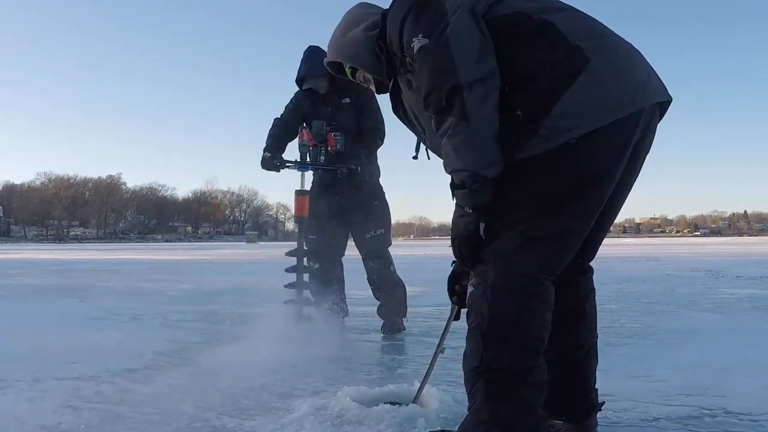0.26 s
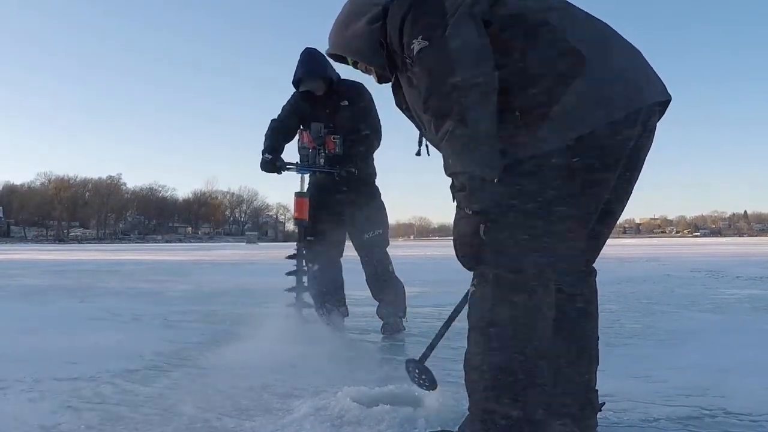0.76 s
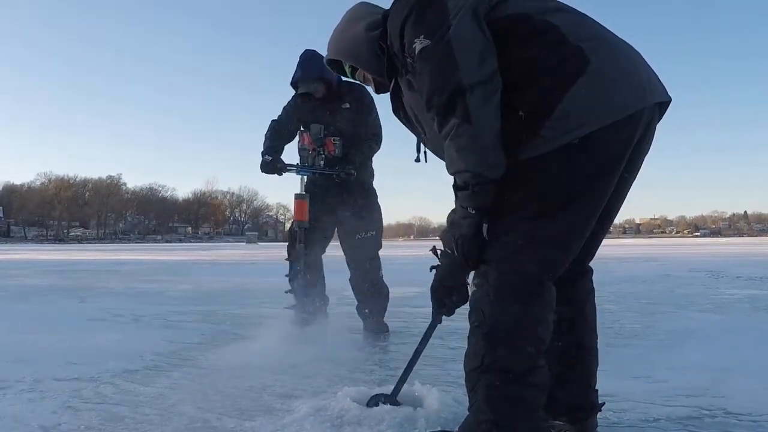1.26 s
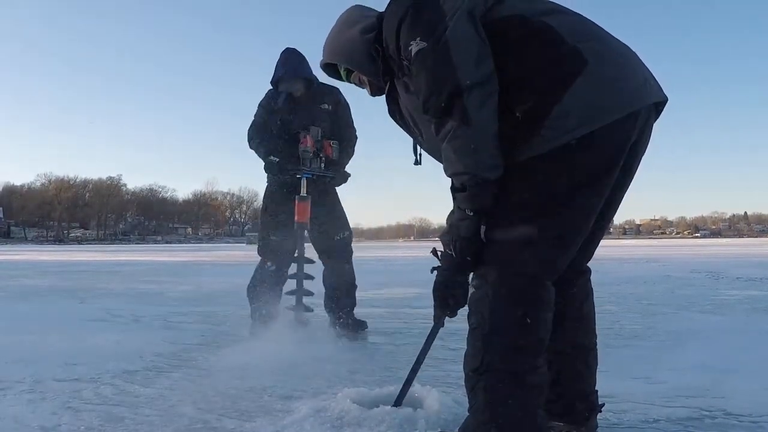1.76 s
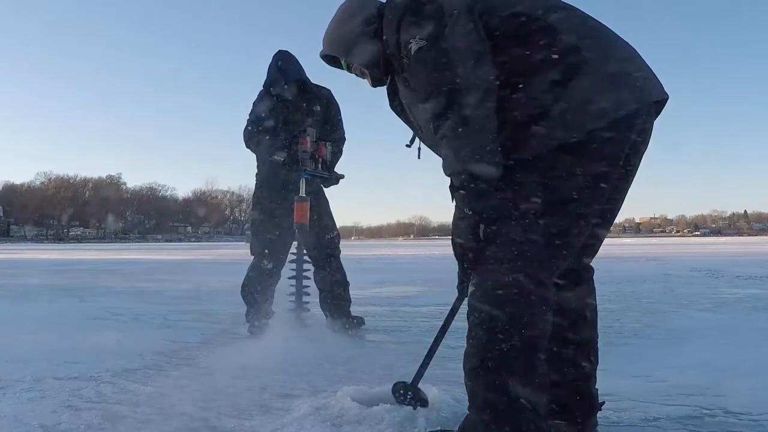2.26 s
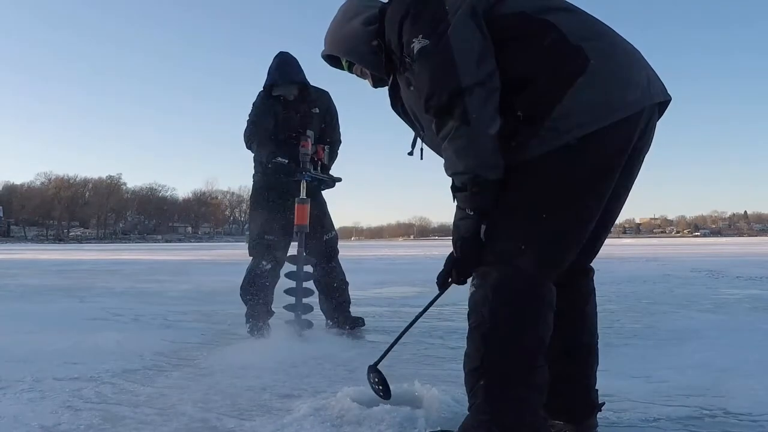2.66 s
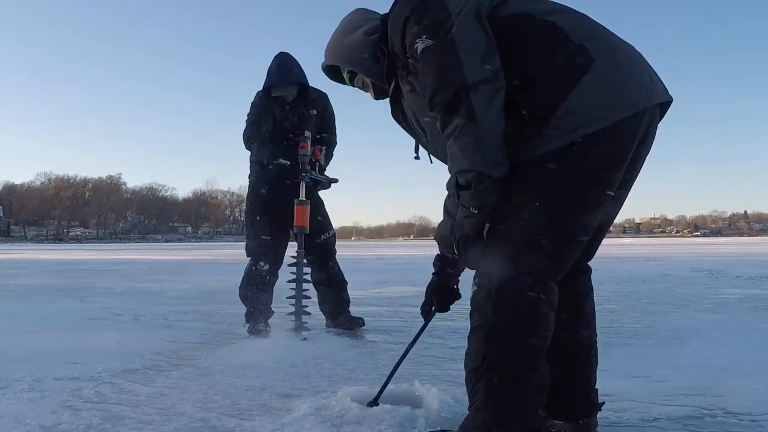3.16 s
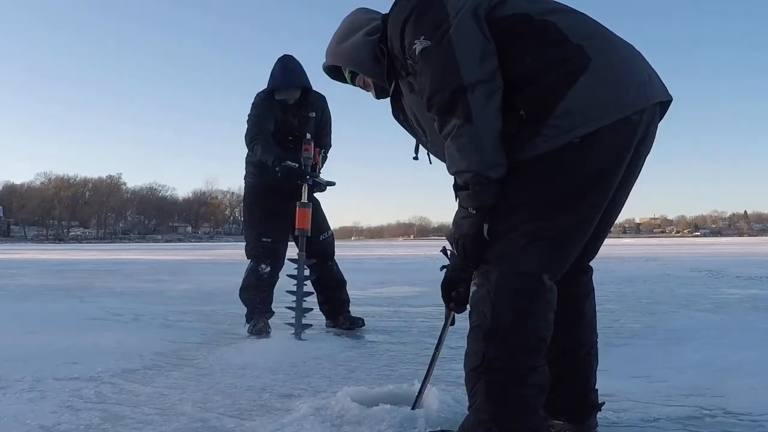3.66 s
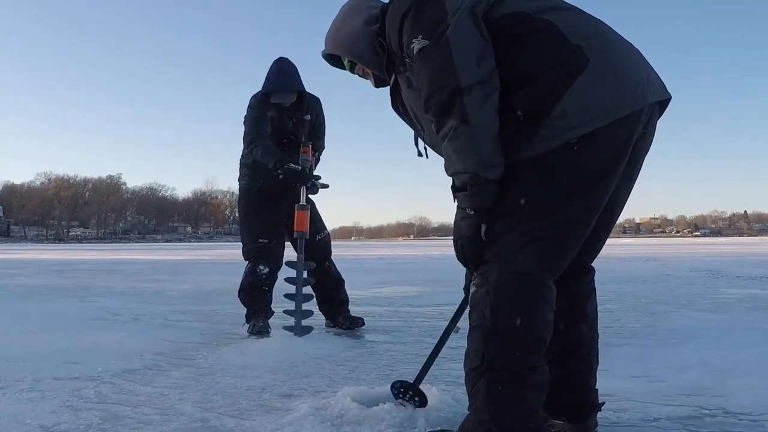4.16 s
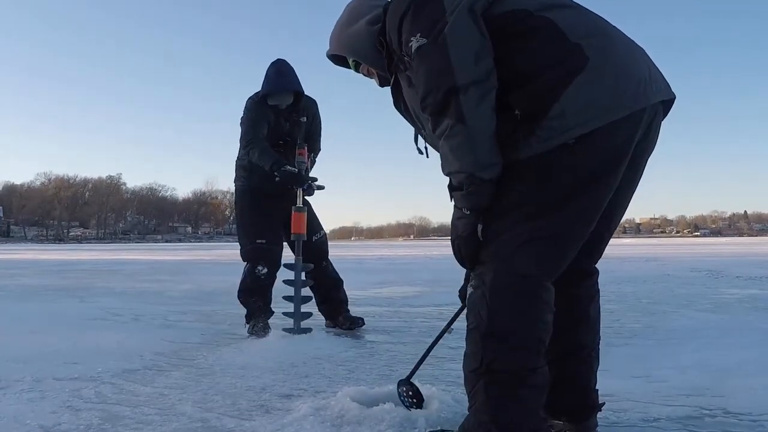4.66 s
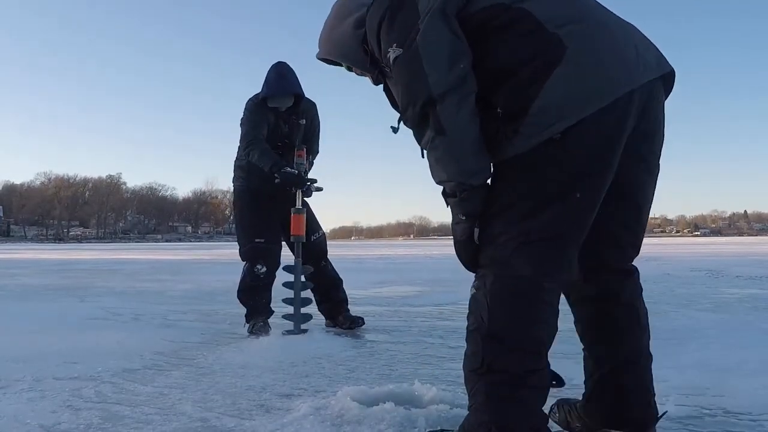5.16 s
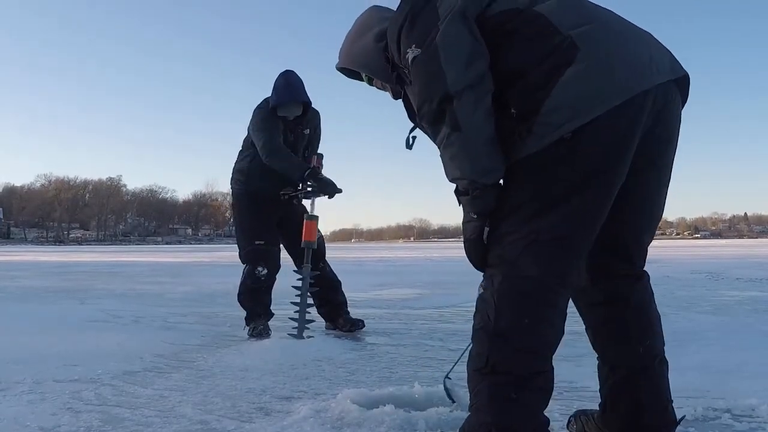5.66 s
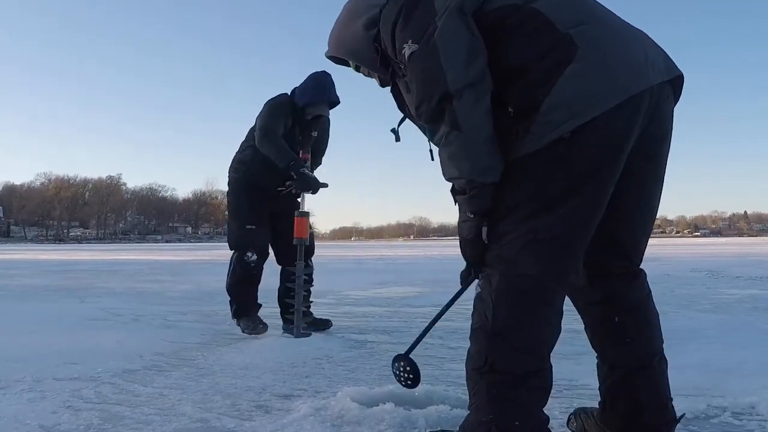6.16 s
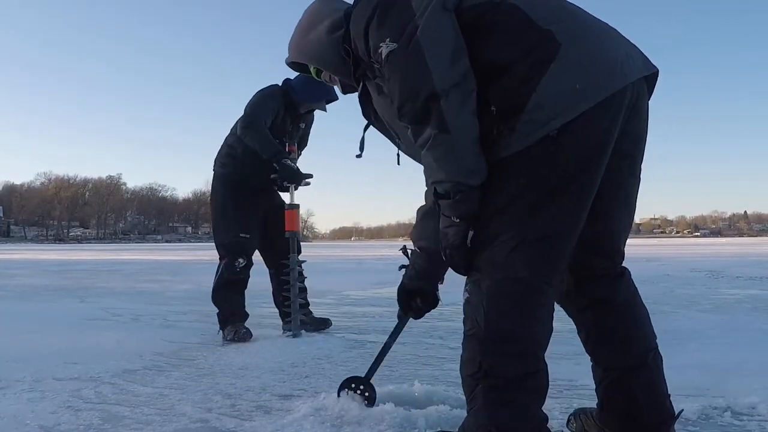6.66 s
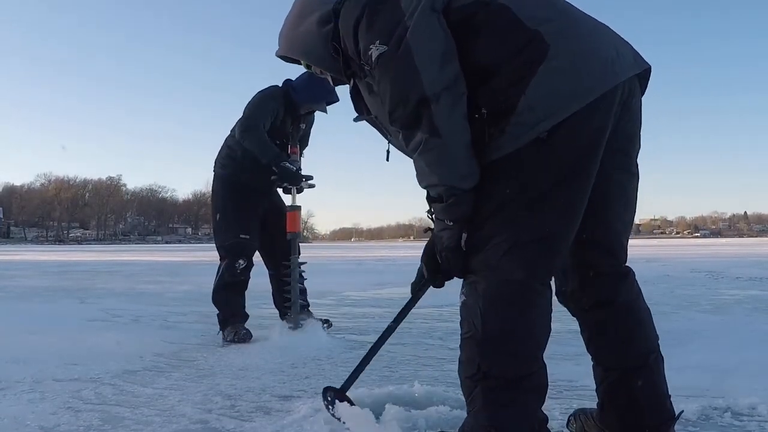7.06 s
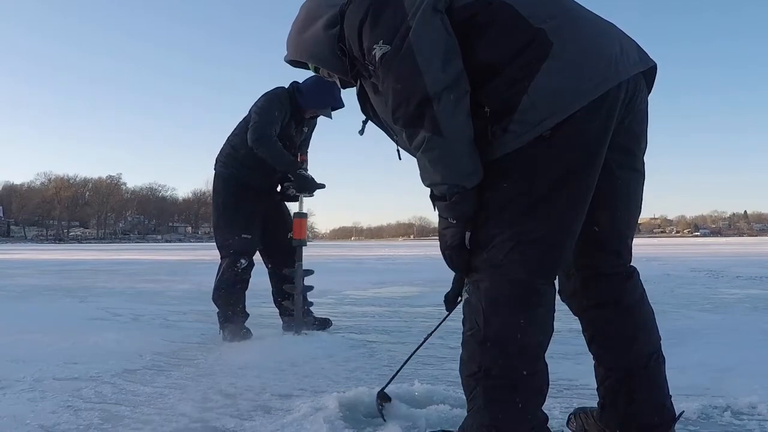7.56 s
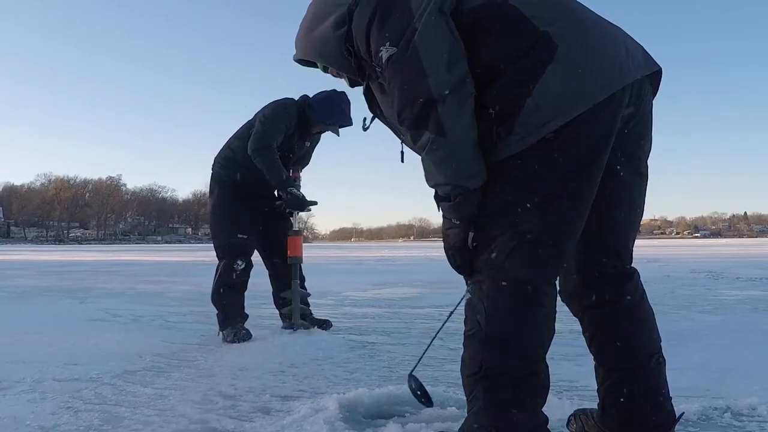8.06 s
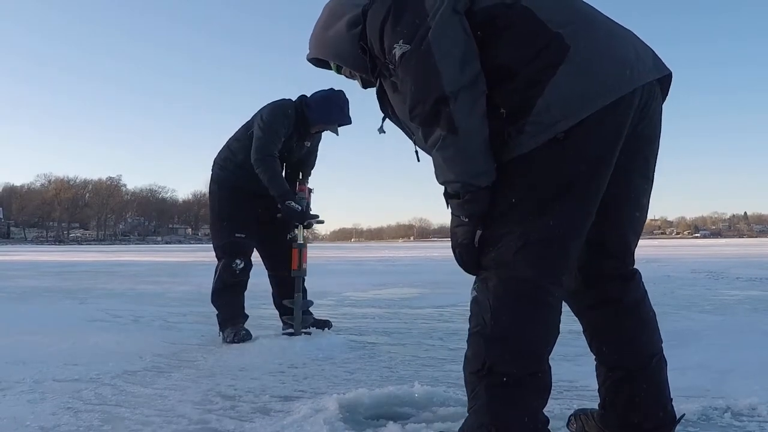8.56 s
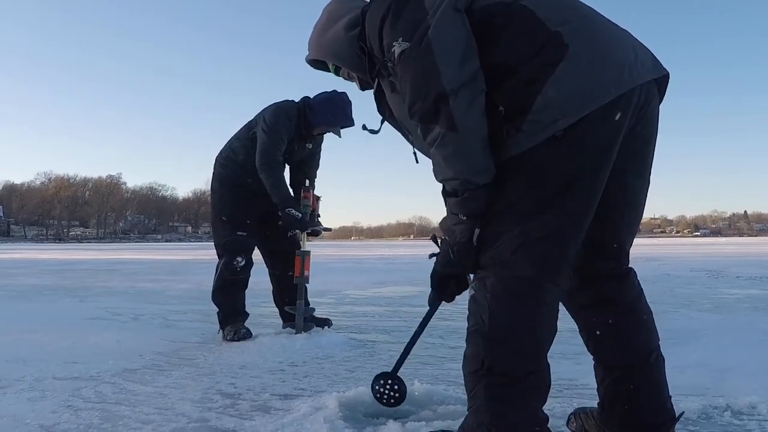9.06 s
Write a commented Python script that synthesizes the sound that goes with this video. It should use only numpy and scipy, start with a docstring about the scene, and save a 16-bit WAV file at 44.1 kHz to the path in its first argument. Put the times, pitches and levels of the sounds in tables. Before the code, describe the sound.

Electric motor whine over crunchy, ringing blade chatter and dry ice hiss, its pitch sinking as the hole deepens. Low ice booms glide down early. Then clacks, thumps and wet slush stirring, short abrupt scrapes on fresh ice and a shallow grind, ending in sparse knocks. Dry outdoor sound, nearly mono, with low wind rumble on the microphone and a tiny dropout near the end.

```python
"""A cordless drill turns an ice auger on a windy frozen lake, a few metres from the microphone.
The motor whines and sags under load, blade chatter rings the auger, shavings hiss and wind buffets throughout;
at the start the ice sheet booms in a few falling glides. After five seconds the cut ends and short knocks of
gear, ice chunks and later the blades ring out while a scoop stirs slush. The blades then skip on fresh ice as
short scrapes and grind again in a shallow hole until the drill stops. Near the end the sound drops out briefly."""
import sys
import numpy as np
from scipy import signal
from scipy.fft import rfft, irfft, next_fast_len
from scipy.io import wavfile
from scipy.ndimage import uniform_filter1d

SR = 44100
rng = np.random.default_rng(int(sys.argv[2]) if len(sys.argv) > 2 else 0)


def int16_out(signal):
    """Quantize to a 16-bit WAV file."""
    q = np.round(np.clip(np.atleast_2d(signal).T, -1, 1) * 32767)
    wavfile.write(sys.argv[1], SR, q.astype(np.int16))


N = 410571
T = np.arange(N) / SR

# how hard the blades cut, one table a run, before trims: t/s, shaft ring level/dB, blade ring level/dB
CUT_RUNS = [
    [(0, -26.5, -23), (1.12, -26, -24), (1.3, -30.5, -31), (1.58, -20.5, -19), (1.75, -29.5, -29.5),
     (1.87, -32, -29), (1.93, -26.5, -22), (3.1, -23.5, -24), (4.1, -23.5, -25), (5.3, -24.5, -26),
     (5.46, -20, -30), (5.535, -25, -30), (5.565, -43, -46)],
    [(7.25, -38, -55), (7.35, -29, -36), (7.38, -22.5, -27.5), (7.66, -24, -32), (7.76, -38.5, -41),
     (8.03, -35, -56), (8.18, -61, -58)],
]
# resonances of crunching ice: f/Hz, width/Hz, level/dB
CRUNCH_MODES = [(1300, 260, -0.88), (1957, 115, 0.12), (2300, 330, 0)]
# resonances of the auger standing free of a hole: f/Hz, width/Hz, level/dB
FREE_AUGER_MODES = [(750, 205, -5.5), (1090, 120, 2), (1324, 114, 5), (1950, 67, -13), (2680, 106, -1.5),
                    (2844, 100, -4)]
# spectrum of scraping ice crumbs: f/Hz, relative density/dB per Hz
HISS_SPECTRUM = [(100, 3), (400, -14), (1000, 4), (1700, 4.5), (3000, 7), (3450, 7), (3700, 8), (3920, 5),
                 (4100, 6), (4350, 4), (4900, 5), (6200, 4.5), (7100, -1), (8500, -2), (11000, -7),
                 (13000, -10.5), (15500, -17)]


def amp(db):
    """Turns decibels into an amplitude factor."""
    return 10 ** (np.asarray(db) / 20)


def evened(x):
    """Scales x to unit RMS."""
    return x / np.sqrt(np.mean(x ** 2) + 1e-20)


def read(points, hz):
    """A spectrum joined by straight lines on a log-frequency axis."""
    f, value = np.transpose(points)
    return np.interp(np.log(hz + 1), np.log(f + 1), value)


def level(rows, column):
    """Gain over time from a dB column, silent outside its span."""
    rows = np.asarray(rows)
    inside = (T >= rows[0, 0]) & (T <= rows[-1, 0])
    soft_gate = uniform_filter1d(inside * 1., size=300)
    return amp(np.interp(T, rows[:, 0], rows[:, column])) * soft_gate


def add(mix, s, sound):
    """Lays a sound into the mix from s seconds on."""
    part = mix[max(round(s * SR), 0):][:len(sound)]
    part += sound[:len(part)]


def shaped(x, gain):
    """Filters x by a gain given as a function of frequency."""
    size = next_fast_len(x.shape[-1] + 4096, True)
    spectrum = rfft(x, size) * gain(np.fft.rfftfreq(size, 1 / SR))
    return irfft(spectrum, size)[..., :x.shape[-1]]


def colour(x, spectrum):
    """Gives x the tilt of a spectrum, at unit RMS."""
    return evened(shaped(x, lambda hz: amp(read(spectrum, hz))))


def wander(hz):
    """Smooth chance of unit RMS, rolled off around the given rate."""
    size = N // 32
    rates = np.fft.rfftfreq(size, N / SR / size)
    slow = irfft(rfft(rng.standard_normal(size)) * np.exp(-(rates / hz) ** 2), size)
    return evened(np.interp(T, np.linspace(0, N / SR, size), slow))


def steadied(x, seconds):
    """Evens out the slow level of x and keeps its fast grain."""
    size = max(int(seconds * SR), 8)
    power = uniform_filter1d(uniform_filter1d(x ** 2, size), size)
    return x / np.sqrt(abs(power) + 1e-12)


def ring(x, modes):
    """Passes x through steep resonances, each a two-pole filter applied twice."""
    out = 0
    for hz, width, db in modes:
        # each stage is wider, so that the pair has the stated width
        section = np.concatenate(signal.iirpeak(hz, hz / (1.55 * width), fs=SR))
        shifted = np.roll(x, int(rng.integers(0, 90)))  # keeps the modes from starting in step
        out = out + amp(db) * signal.sosfilt([section, section], shifted)
    return out


def resonate(x, hz, width):
    """A steep resonance that follows the curve hz: x is shifted down to zero, smoothed and shifted back."""
    turn = np.exp(2j * np.pi * np.cumsum(hz) / SR)
    r = np.exp(-np.pi * 1.55 * width / SR)
    smooth = signal.lfilter([(1 - r) ** 2], [1, -2 * r, r * r], x * turn.conj() + 1e-18)
    return 2 * (turn * smooth).real


def fractures(per_s, spread_db):
    """Random tiny breaks in the ice; with some spread, most are small and a few large."""
    size = amp(spread_db * np.minimum(rng.exponential(1, N), 4))
    return evened(size * rng.choice([-1, 1], N) * (rng.random(N) < per_s / SR))


def swell(s, rise_s, fall_s):
    """A rounded rise and fall that peaks at s."""
    u = abs(T - s) / np.where(T < s, max(rise_s, .005), max(fall_s, .005))
    out, near = np.zeros(N), u < 10
    out[near] = np.exp(1 - np.hypot(1, u[near] * np.sqrt(2)))
    return out


def drive():
    """The load over time sets the whine's pitch, the drop of the cutting and the turns that time the throb."""
    # motor speed while the blades bite, sinking as the hole deepens: t/s, whine f/Hz before slips and snags
    speed = [(0, 3850), (1.0, 3780), (1.65, 3355), (2.08, 3560), (2.26, 3270), (2.7, 2980), (3.17, 3037),
             (3.4, 2904), (3.5, 2880), (3.62, 2976), (3.95, 2800), (4.05, 2830), (4.2, 2790), (4.7, 2753),
             (4.85, 2980), (5.0, 2990), (5.28, 2827), (5.55, 2602)]
    # motor speed on the fresh hole: t/s, whine f/Hz
    restart = [(6.87, 3000), (6.9, 2960), (6.96, 3500), (7.3, 3600), (7.4, 3080), (7.5, 3650), (7.65, 3250),
               (7.8, 3460), (7.9, 3460), (8.02, 3550), (8.18, 3300)]
    # blades lose their bite, the cutting fades and the motor races:
    # peak t/s, rise/s, fall/s, change of whine f/Hz, drop of the cutting/dB
    slips = [(0.18, 0.1, 0.17, 541.0, 5.0), (0.65, 0.121, 0.15, 500.0, 4.3), (0.79, 0.11, 0.14, 290.0, 0.0),
             (1.18, 0.08, 0.25, 650.0, 8.5), (1.424, 0.202, 0.25, 792.0, 6.1),
             (1.8, 0.13, 0.28, 850.0, 4.5), (1.89, 0.08, 0.1, 230.0, 1.5), (2.428, 0.15, 0.23, 681.0, 6.9),
             (2.858, 0.15, 0.17, 1100.0, 9.2), (2.995, 0.1, 0.185, 850.0, 3.0),
             (3.299, 0.116, 0.075, 238.0, 0.0), (3.797, 0.162, 0.11, 640.0, 3.5),
             (4.385, 0.177, 0.185, 879.0, 2.1), (4.578, 0.137, 0.118, 519.0, 0.0),
             (5.105, 0.154, 0.129, 544.0, 3.8)]
    # blades snag, the cut flares and the motor bogs: t/s, half length/s, sag of whine f/Hz, rise of the cutting/dB
    snags = [(1.925, 0.015, 1, 7), (3.062, .02, 76.5, 5.5), (3.165, 0.011, 81.5, 0),
             (3.867, 0.026, 60.5, 3), (4.109, 0.02, 149, 1), (4.64, 0.019, 105, 1.5),
             (5.168, 0.015, 45.5, 4)]
    # timing of the throb against the summed turns: t/s, lead/turns
    throb_lead = [(0, .07), (.4, .05), (1.05, -.07), (1.4, .05), (2.1, .125), (2.8, .16), (3.2, .205),
                  (4.2, .225), (5.5, .23)]
    slip_curve = 1.3  # above 1, a slip builds gently and peaks sharply
    whine_per_turn = 788  # whine cycles in one turn of the auger

    hz, drop_db = np.interp(T, *np.transpose(speed + restart)), np.zeros(N)
    for s, rise_s, fall_s, gain_hz, db in slips:
        slack = np.interp(T, [s - rise_s, s, s + fall_s], [0, 1, 0]) ** slip_curve
        hz, drop_db = hz + gain_hz * slack, drop_db + db * slack
    for s, half_s, sag_hz, db in snags:
        snag = swell(s, half_s, half_s)
        hz, drop_db = hz - sag_hz * snag, drop_db - db * snag
    turns = np.cumsum(hz) / SR / whine_per_turn + np.interp(T, *np.transpose(throb_lead))
    return hz, drop_db, turns


def throbs(turns):
    """Two blade passes a turn swell the cut and slow the motor; chatter at twice that rate grows with depth."""
    pass_db, chatter_db, chatter_db_per_s = 2, 1.76, 0.31
    chatter_lag_turns, ripple_lag_turns = .19, 0.05
    ripple_hz = 18.7  # the motor slows a little after each blade pass

    passes, chatters = 2 * turns, 4 * (turns - chatter_lag_turns)
    first_run = T < CUT_RUNS[0][-1][0]
    depth_db = chatter_db + chatter_db_per_s * T * first_run
    sag_hz = ripple_hz * np.cos(2 * np.pi * (passes - 2 * ripple_lag_turns))
    return pass_db * np.cos(2 * np.pi * passes), depth_db * np.cos(2 * np.pi * chatters), sag_hz


def motor(hz, drop_db):
    """The whine follows shaft speed, shaken by load; a slower gear mesh hums, with an overtone at high speed."""
    # the whine is loudest when the motor labours: whine f/Hz, relative level/dB
    labour = [(2650, -25), (2800, -3.5), (2940, 0), (3100, -7.5), (3210, -0.5), (3400, -8.5), (3530, -14.5),
              (3800, -9), (4020, -10), (4300, -11)]
    # how the drill carries, one table a run, before trims: t/s, whine level/dB, gear hum level/dB
    drill_runs = [
        [(0, -31, -52), (.55, -34, -48), (.68, -27, -39), (.95, -34, -61), (1.22, -37, -30), (1.38, -36, -28.5),
         (1.48, -25, -32), (1.62, -31, -58), (1.75, -43, -39), (1.85, -44, -27), (1.97, -35, -48),
         (2.14, -22, -51), (2.25, -31, -54), (2.77, -27.5, -48), (2.95, -33, -39), (3.2, -29, -27),
         (4.27, -28.5, -53), (4.385, -32, -46), (4.45, -29.5, -54), (4.95, -29, -53), (5.15, -33, -44),
         (5.53, -37, -37)],
        [(6.88, -37, -49), (6.95, -48, -34), (7.4, -40, -50), (7.7, -43, -49), (7.87, -36.5, -58),
         (8.05, -44, -55), (8.2, -54, -66)],
    ]
    flutter_db, whine_db, gear_db = 2.6, 2, -1
    gear_order, overtone_order = .262, .75  # pitch as a share of the whine's
    whine_share = 0.7  # share of the cutting's drop that the whine follows

    unsteady = 1 + .006 * wander(78.0) + .0035 * wander(22.3)
    phase = 2 * np.pi * np.cumsum(hz * unsteady) / SR
    whine_level_db = whine_db + read(labour, hz) - whine_share * drop_db
    whine_flutter_db = flutter_db * np.minimum(wander(42.2), 1.3)
    whine = amp(whine_level_db + whine_flutter_db) * np.sin(phase)
    play = 0.96 * wander(53)  # play in the gears blurs the hum, in radians
    mesh = ring(np.sin(gear_order * phase + play), [(1110, 260, 0)])
    overtone = ring(np.sin(overtone_order * phase + play), [(3000, 590, -9)])
    gear = amp(gear_db + flutter_db * np.minimum(wander(40), 1.3)) * (mesh + overtone)
    return np.sqrt(2) * sum(level(rows, 1) * whine + level(rows, 2) * gear for rows in drill_runs)


def chatter(breaks, modes):
    """Each clump of breaks lands elsewhere on the blades, so it favours other modes and pulls them off pitch."""
    detune, shift_hz = .024, 16
    favour_db, favour_hz = 2.4, 28
    total = 0
    for hz, width, db in modes:
        gain = amp(db + favour_db * wander(favour_hz))
        pitch = hz * (1 + detune * wander(shift_hz))
        total = total + gain * resonate(breaks * rng.choice([-1, 1], N), pitch, width)
    return steadied(total, .09)


def auger(drop_db, pass_db, chatter_db):
    """The blades stick and slip: clumps of fractures ring shaft, blades and ice; depth muffles the crunch."""
    # resonances of the shaft, then the blades, in the deep hole: f/Hz, width/Hz, level/dB
    shaft_modes = [(1000, 43, -4.5), (1100, 77, 0), (1238, 116, -7), (1364, 176, -11), (1479, 63, -6)]
    blade_modes = [(2460, 260, -6.5), (2633, 134, -1), (2800, 100, 2)]
    # the same in a fresh, shallow hole: f/Hz, width/Hz, level/dB
    fresh_shaft_modes = [(520, 72, -3.5), (770, 48, -0.5), (990, 69, 3), (1195, 130, -8), (1340, 170, -1),
                         (1520, 63, -8)]
    fresh_blade_modes = [(1920, 110, -6), (2500, 94, -0.5), (2760, 120, -1)]
    # resonances of the ice sheet, then of the ice around the hole: f/Hz, width/Hz, level/dB
    sheet_modes = [(480, 130, 2), (580, 130, 1), (765, 90, -2), (980, 100, -9)]
    hole_modes = [(276, 41, -2), (561, 130, -0.5), (755, 71, 0)]
    # blades grinding down into the ice sheet: peak t/s, level/dB, rise/s, fall/s
    grinds = [(7.22, -40.5, 0.1, 0.12), (7.385, -28.5, 0.032, 0.13), (7.615, -23.5, 0.018, 0.074),
              (7.71, -35.5, .03, 0.088), (8.0, -36, 0.08, 0.13)]
    # the ice around the hole rings most when the auger bears down: t/s, level/dB before trim
    bearing = [(0, -36), (1.1, -42), (1.58, -42.5), (2.7, -39), (2.96, -39), (3.1, -35), (3.7, -38.5),
               (4.0, -34.5), (4.22, -34), (4.32, -43), (4.55, -40), (4.7, -35.5), (5.1, -41), (5.42, -34),
               (5.53, -33), (5.56, -44)]
    shaft_db, blade_db, hole_db = -1.5, -2.5, -1
    crunch_db, muffle_db_per_s = 3, 2.8
    blade_share = .15  # share of the blade-pass swell that the blade ring follows

    judder_db = 1.1 * np.minimum(wander(14), 1.5)
    rasp_db = 1.7 * np.minimum(wander(55), 1.5)
    breaks = fractures(per_s=2200, spread_db=0.0) * amp(judder_db + rasp_db)
    shaft, blade = chatter(breaks, shaft_modes), chatter(breaks, blade_modes)
    fresh_shaft, fresh_blade = chatter(breaks, fresh_shaft_modes), chatter(breaks, fresh_blade_modes)
    sheet, hole = chatter(breaks, sheet_modes), chatter(breaks, hole_modes)
    crunch = chatter(breaks, CRUNCH_MODES)
    crunchy = amp(crunch_db - muffle_db_per_s * T)
    blade = (blade + crunchy * crunch) / np.hypot(1, crunchy)

    deep, fresh = CUT_RUNS
    shafts = level(deep, 1) * shaft + level(fresh, 1) * fresh_shaft
    shafts = amp(shaft_db + pass_db) * shafts
    blades = level(deep, 2) * blade + level(fresh, 2) * fresh_blade
    blades = amp(blade_db + chatter_db + blade_share * pass_db) * blades
    grinding = sum(amp(db) * swell(s, rise_s, fall_s) for s, db, rise_s, fall_s in grinds)
    around_hole = amp(hole_db - drop_db / 2) * level(bearing, 1) * hole
    return amp(-drop_db) * (shafts + blades) + grinding * sheet + around_hole


def spray(load_db):
    """Gains of the hiss and of its fine fizz: dust that follows the cutting, and swishes of slush."""
    # ice dust from the auger, less as the hole deepens, over a faint drift of powder:
    # t/s, hiss level/dB before load, fine fizz relative to the hiss/dB
    dust = [(0, -31, -6), (.5, -31.5, -4), (1.1, -31.5, -6.5), (1.28, -34, -4), (1.5, -29, -6.5),
            (1.75, -35.5, -4.5), (2, -30, -6.5), (2.7, -34.5, -6.5), (3.5, -38.5, -9.5), (5.3, -36, -11.5),
            (5.5, -41.5, -13), (5.6, -53, -8), (6.07, -61.5, 6), (6.32, -59.5, 7), (6.4, -53, 1),
            (6.86, -65, 14), (6.918, -42.5, -7), (7.35, -42, -4), (7.6, -38.5, -9.5), (7.7, -44, -8),
            (8.02, -43.5, -7), (8.2, -57, -1), (8.6, -72, 10.5), (9.098, -63, 1.5), (9.31, -74, -12)]
    # slush swept by the scoop and the auger:
    # peak t/s, level/dB, rise/s, fall/s, fine fizz relative to the level/dB
    swishes = [(5.53, -38.5, 0.026, 0.012, -7), (5.68, -41.5, 0.069, 0.042, -7),
               (5.85, -46.5, 0.076, 0.11, -4), (6.005, -45, 0.069, 0.016, -8),
               (6.18, -43, 0.025, 0.041, -1.5), (6.27, -49.5, 0.018, 0.015, -9),
               (6.5, -47.5, 0.016, 0.037, -1), (6.71, -42.5, 0.061, 0.058, -6.5),
               (6.8, -42.5, 0.053, 0.023, -8), (6.905, -35.5, 0.0047, 0.014, -8),
               (7.19, -38, .03, 0.069, -3.5), (8.44, -51, 0.072, 0.27, -3.5), (8.82, -54, 0.059, 0.051, -8)]
    dust_share = 0.24  # share of the load's decibels that the hiss follows

    s, db, fine_db = np.transpose(dust)
    hiss_power = amp(np.interp(T, s, db) + dust_share * load_db) ** 2
    fine_power = hiss_power * amp(np.interp(T, s, fine_db)) ** 2
    for s, db, rise_s, fall_s, fine_db in swishes:
        power = (amp(db) * swell(s, rise_s, fall_s)) ** 2
        hiss_power = hiss_power + power
        fine_power = fine_power + power * amp(fine_db) ** 2
    return np.sqrt(hiss_power), np.sqrt(fine_power)


def patchy(x, depth_db):
    """Crumbs of changing size make brief patches of colour."""
    z = signal.stft(x, nperseg=512)[2]
    patches = uniform_filter1d(rng.standard_normal(z.shape), size=6, axis=0)
    patches = evened(uniform_filter1d(patches, size=7, axis=1))
    return signal.istft(z * amp(depth_db * patches), nperseg=512)[1][:N]


def shavings(hiss, fine):
    """Countless ice crumbs scrape and scatter; dry powder fizzes more than wet slush."""
    flicker = amp(0.86 * wander(31))
    crumbs = colour(fractures(per_s=11000, spread_db=2.0) * flicker, HISS_SPECTRUM)
    crumbs = patchy(crumbs, depth_db=1.8)
    fizz = shaped(crumbs, lambda hz: np.clip((hz - 6500) / 4000, 0, 1))
    middle = shaped(crumbs, lambda hz: (hz > 4000) & (hz < 8000))  # the band that sets the hiss level
    return hiss * (crumbs - fizz) / middle.std() + fine * evened(fizz)


def reflected(x):
    """One close reflection ripples the spectrum."""
    echo_db, delay_s = -13, .00219
    return shaped(x, lambda hz: 1 + amp(echo_db) * np.exp(-2j * np.pi * hz * delay_s))


def wind(gusts):
    """Eddies buffet the microphone; the strongest pushes carry a flutter above the rumble."""
    # the breeze on the microphone, before trims: t/s, rumble level/dB, flutter level/dB
    breeze = [(0, -25.5, -63), (.75, -20, -55), (1, -33.5, -44.5), (1.15, -20, -41), (1.8, -20, -43),
              (2.4, -22, -50), (2.7, -21.5, -43.5), (2.85, -22.5, -50), (3.1, -23.5, -46),
              (3.4, -20.5, -45.5), (5.2, -23, -43), (5.55, -26, -42), (5.7, -18, -39), (6.33, -26.5, -51.5),
              (6.48, -16.5, -42), (6.57, -29, -56), (6.7, -17, -44), (6.83, -21, -44), (7.1, -22.5, -41),
              (8.03, -18.5, -44), (8.17, -32, -52), (8.27, -22, -49), (8.5, -18.5, -43.5),
              (8.93, -20, -43.5), (9.13, -33, -56), (9.31, -17, -38)]
    # spectra of the rumble, the flutter and the thin air noise: f/Hz, relative density/dB per Hz
    rumble_spectrum = [(1, -17), (5, -3.5), (12, 0), (22, 1), (35, -6.5), (60, -11.5), (90, -23),
                       (150, -51), (400, -73), (1500, -84)]
    flutter_spectrum = [(30, -11), (80, 6.5), (130, -0.5), (200, -6.5), (300, -10.5), (500, -21),
                        (1000, -28.5), (4000, -48)]
    air_spectrum = [(30, -6), (300, 18), (700, 17), (1400, 9), (3000, -9), (8000, -28), (15000, -23)]
    rumble_db, flutter_db, air_db, ceiling_db = 1.3, 7.5, -57, -6
    gust_rumble_db = 21  # a gust's rumble above its flutter, before trims

    rumble = steadied(colour(rng.standard_normal(N), rumble_spectrum), 0.22)
    lumps = (0.31 + abs(rumble)) * amp(wander(15))
    flutter = steadied(colour(rng.standard_normal(N), flutter_spectrum) * lumps, 0.081)
    air = amp(air_db) * colour(rng.standard_normal(N), air_spectrum)
    push = amp(rumble_db) * np.hypot(level(breeze, 1), amp(gust_rumble_db) * gusts) * rumble
    push = amp(ceiling_db) * np.tanh(push / amp(ceiling_db))  # the hardest pushes level off
    return push + amp(flutter_db) * np.hypot(level(breeze, 2), gusts) * flutter + air


def booms():
    """Bending waves in the ice arrive high notes first; scattered waves from the far lake follow."""
    # falling glides through the ice sheet: t/s, level/dB, starting f/Hz, ending f/Hz, length/s
    glides = [(.112, -24, 250, 138, 0.063), (.162, -25, 259, 230, 0.064), (.315, -31, 200.4, 177, 0.09),
              (.425, -31, 184, 169, 0.059)]
    tail_db, tail_delay_s, tail_spread_s = -33, 0.36, 0.25  # the tail peaks this long after the first glide

    out = np.zeros(N)
    for s, db, from_hz, to_hz, length in glides:
        hz = np.geomspace(from_hz, to_hz, int(length * SR))
        glide = np.sin(2 * np.pi * np.cumsum(hz) / SR) * signal.windows.tukey(len(hz), .6)
        add(out, s, np.sqrt(2) * amp(db) * glide)
    scattered = ring(rng.standard_normal(N), [(185.0, 23, -0.18), (231, 82, -0.82)])
    tail = np.exp(-((T - glides[0][0] - tail_delay_s) / tail_spread_s) ** 2 / 2)
    return out + amp(tail_db) * steadied(scattered, 0.15) * tail


def slush(hiss):
    """Resonant noise sloshes in the scoop's hole, swelling with the hiss of swishes, and ice chips tinkle."""
    slosh_db, swish_db, tick_db = -53, -7, -59
    start_s, end_s = 4.1, 8.9

    lumpy = rng.standard_normal(N) * amp(5.2 * wander(34))
    slosh = ring(lumpy, [(476, 88, 1.5), (766, 190, -3), (1260, 510, 0.5)])
    ticks = 0
    for hz in np.geomspace(1100, 9000, num=10):
        ticks = ticks + ring(fractures(per_s=14, spread_db=1.7), [(hz, hz / 9, 0)])
    sloshing = np.hypot(amp(slosh_db), amp(swish_db) * hiss) * evened(slosh)
    gate = level([(start_s, 0), (end_s, 0)], 1)
    return gate * (sloshing + amp(tick_db) * evened(ticks))


def knocks():
    """Short knocks: a sharp contact and a scatter of chips, with a crack on top and some ring of steel."""
    # knocks of gear and ice chunks, and a few hard catches of the blades: t/s, peak level/dB, body f/Hz,
    # crack relative to the body/dB, steel ring relative to the body/dB, t60/s of the blow
    blows = [(5.589, -26, 2470, -5, 2, .02), (5.636, -27.5, 1000, -19, -9, 0.23),
             (5.718, -24, 2980, -2, 0, .035), (5.775, -23, 2850, 3, -4, 0.036),
             (5.804, -20.5, 1250, -5, -11, 0.037), (5.847, -22, 3400, -1, -13, .025),
             (5.855, -10, 990, -1, -12, 0.03), (5.943, -33, 900, -16, -10, .04),
             (5.963, -23, 850, -13, -5, 0.056), (6.032, -33, 2670, -12, 7, 0.024),
             (6.063, -28.5, 1100, -12, -6, .045), (6.119, -28, 950, -5, -1, .035),
             (6.141, -38, 1300, -8, -3, .025), (6.178, -33, 695, -2, -12, .04),
             (6.257, -40, 2000, -1, -14, .03), (6.365, -25.5, 1720, -8, -17, 0.021),
             (6.879, -35, 2960, -4, -14, .07), (6.895, -19, 2870, -22, -20, .03),
             (7.285, -15.5, 1090, -23, -12, .05), (7.368, -13.5, 520, -13.5, -11, 0.082),
             (7.672, -11.5, 464, -30, -6, 0.055), (8.012, -12, 480, -24, -15, 0.025),
             (8.051, -24, 780, -23, -6, .04), (8.214, -30, 1530, -16, -6, 0.032),
             (8.268, -32, 1100, -17, -18, 0.026), (8.307, -26.5, 1100, -18, -14, .035),
             (8.435, -26, 2380, 2, -15, 0.042), (8.545, -35, 2390, -14, -18, .05),
             (8.641, -43, 6000, -5, -25, .015), (8.718, -29, 870, -12, -3, 0.055),
             (9.096, -35, 2300, -13, -1, 0.086)]
    damping, grit_db = 0.34, -4  # body width as a share of its pitch; steady grit among the chips
    chips_per_s, contact = 1300, 1.2

    out, t = np.zeros(N), np.arange(SR // 6) / SR
    for s, db, hz, crack_db, steel_db, t60 in blows:
        scatter = (rng.random(len(t)) < chips_per_s / SR) + amp(grit_db) / 2
        chips = rng.standard_normal(len(t)) * scatter
        hit = contact * (t == t[SR // 1000])  # a single click after 1 ms
        blow = (chips + hit) * amp(-60 * t / max(t60, .008))
        sound = evened(ring(blow, [(hz, min(damping * hz, 700), 0)]))
        sound += amp(steel_db) * evened(ring(blow, FREE_AUGER_MODES))
        sound += amp(crack_db) * colour(blow, HISS_SPECTRUM)
        add(out, s, amp(db) * sound / abs(sound).max())
    return out


def bites():
    """Each catch of a blade is one short, abrupt scrape ringing the auger, which stands free of any hole."""
    # blades catching and skipping on fresh ice: t/s, envelope peak/dB, length/s
    catches = [(6.907, -29, 0.0057), (6.922, -26, 0.013), (6.937, -28, 0.018), (6.969, -23.5, 0.027),
               (7.008, -23, 0.019), (7.032, -21.5, 0.0263), (7.092, -29, 0.017), (7.11, -26, 0.031),
               (7.153, -24.5, 0.026), (7.201, -27.5, 0.024), (7.235, -34, 0.02), (7.314, -35.5, 0.049),
               (7.539, -28, .022), (7.601, -24.5, 0.029), (7.639, -21, 0.017)]
    crunch_db, crack_db = -15, -13

    envelope, breaks = np.zeros(N), fractures(per_s=2500, spread_db=0.0)
    for s, db, length in catches:
        add(envelope, s, amp(db) * signal.windows.tukey(int(max(length, .005) * SR), 0.47))
    scrape = evened(ring(breaks, FREE_AUGER_MODES))
    scrape = scrape + amp(crunch_db) * evened(ring(breaks, CRUNCH_MODES))
    scrape = scrape + amp(crack_db) * colour(breaks, HISS_SPECTRUM)
    return envelope * steadied(scrape, 0.01)


def scene():
    """Everything sits in the middle; only the hiss and the wind differ between the ears."""
    # gusts of wind: peak t/s, flutter level/dB before trim
    gust_rows = [(1.78, -46), (2.62, -42), (3.88, -36.5), (4.35, -38), (4.9, -40), (5.03, -39.5),
                 (5.27, -45), (6.13, -38), (6.27, -38), (6.41, -33.5), (6.74, -36.5), (6.9, -34),
                 (7.19, -38.5), (8.02, -32.5), (8.25, -42), (8.72, -39.5), (8.86, -37), (9.31, -34.5)]
    # how much the hiss and wind differ between the ears: f/Hz, side gain/dB
    width = [(30, -20.5), (120, -18.5), (500, -23), (1100, -57), (2800, -58), (4500, -71), (6000, -12),
             (8500, -6.5), (15000, -10.5)]
    gust_rise_s, gust_fall_s = 0.038, 0.037

    hz, drop_db, turns = drive()
    pass_db, chatter_db, sag_hz = throbs(turns)
    hiss, fine = spray(pass_db / 2 - drop_db)
    gusts = sum(amp(db) * swell(s, gust_rise_s, gust_fall_s) for s, db in gust_rows)
    drill = motor(hz - sag_hz, drop_db) + auger(drop_db, pass_db, chatter_db)
    mid = drill + reflected(shavings(hiss, fine)) + wind(gusts)
    mid = mid + booms() + slush(hiss) + knocks() + bites()
    # fresh draws of hiss and wind make the side signal
    side = reflected(shavings(hiss, fine)) + wind(gusts)
    side = shaped(side, lambda hz: amp(read(width, hz)))
    return np.array([mid + side, mid - side])


def record(dry):
    """The sound drops out briefly near the end; then a steep low-pass limits the band."""
    dropout_start_s, dropout_end_s = 9.203, 9.262
    edge_hz = 15300
    live = uniform_filter1d(1. * ((T < dropout_start_s) | (T > dropout_end_s)), size=40)
    low_pass = signal.firwin(511, edge_hz, window=("kaiser", 9), fs=SR)
    return signal.oaconvolve(dry * live, low_pass[None], "same")


dry = scene()
out = record(dry)
int16_out(out)
```